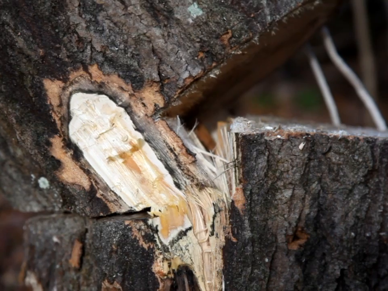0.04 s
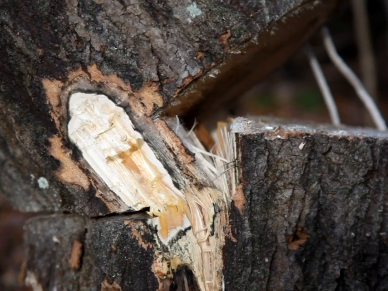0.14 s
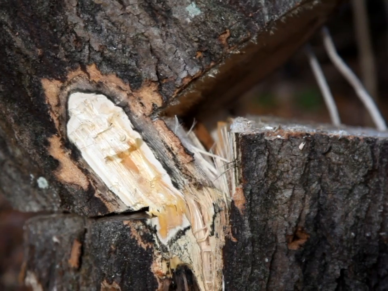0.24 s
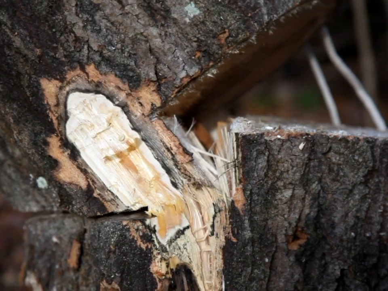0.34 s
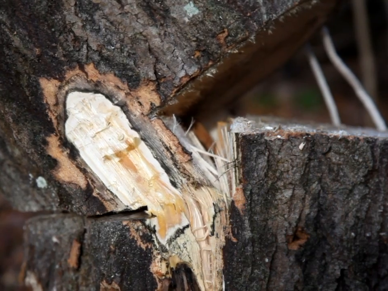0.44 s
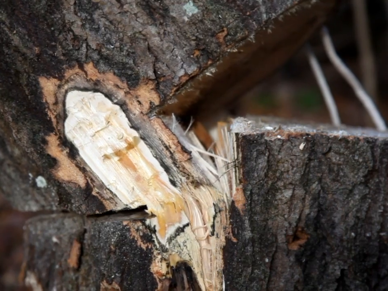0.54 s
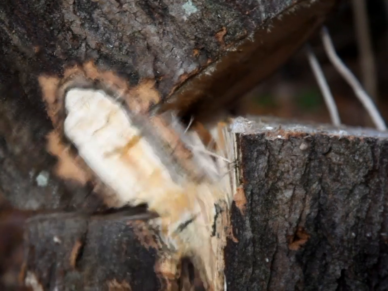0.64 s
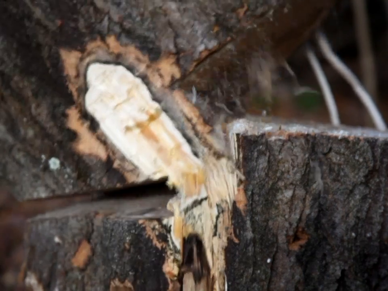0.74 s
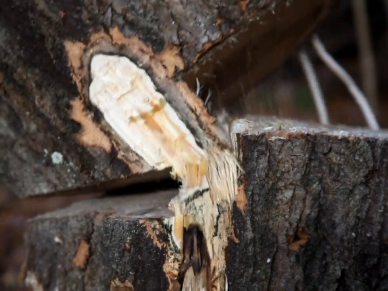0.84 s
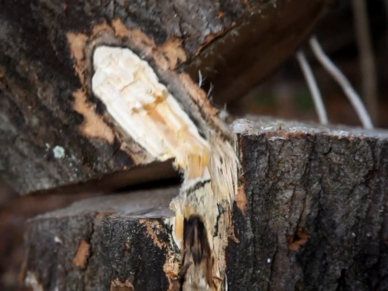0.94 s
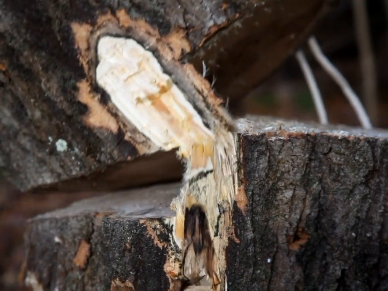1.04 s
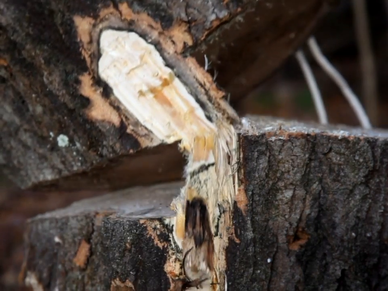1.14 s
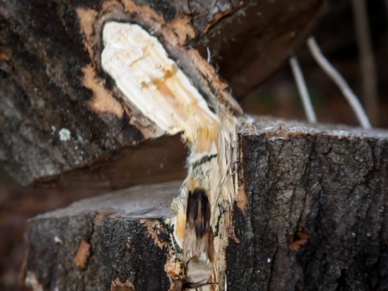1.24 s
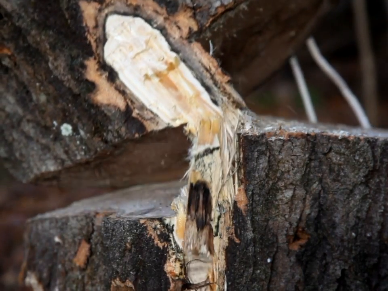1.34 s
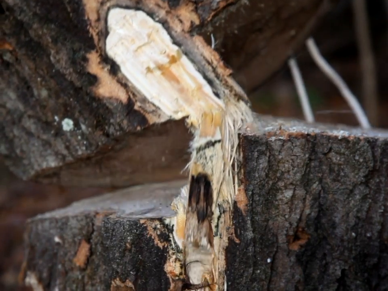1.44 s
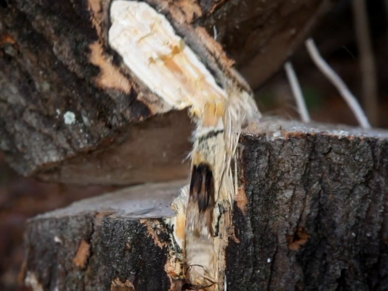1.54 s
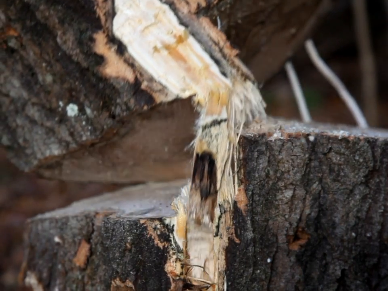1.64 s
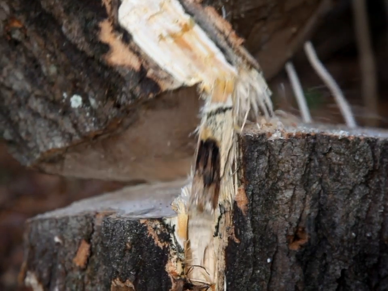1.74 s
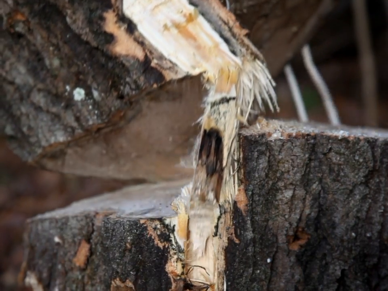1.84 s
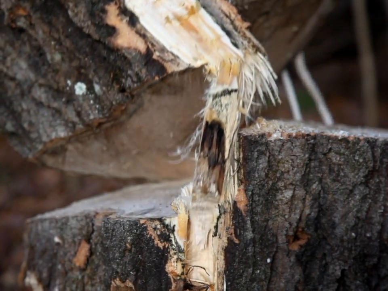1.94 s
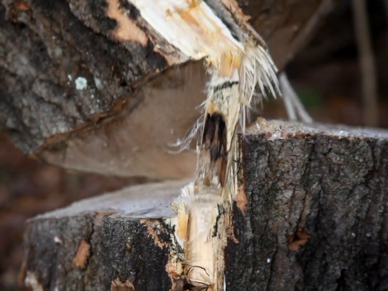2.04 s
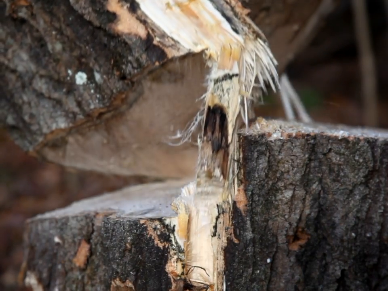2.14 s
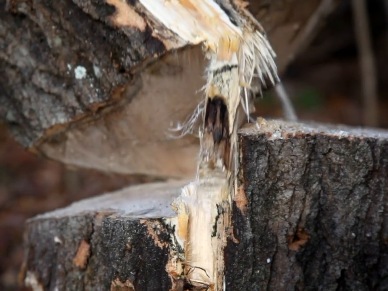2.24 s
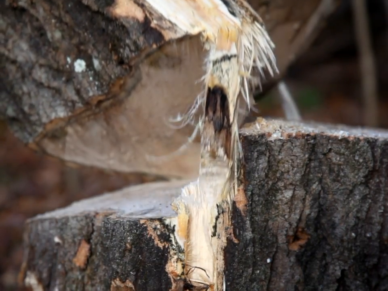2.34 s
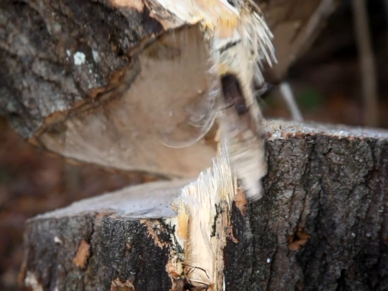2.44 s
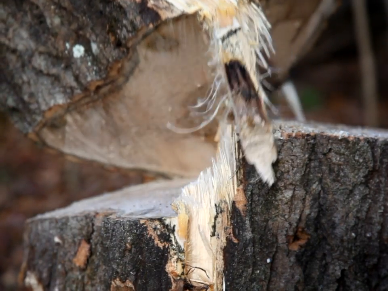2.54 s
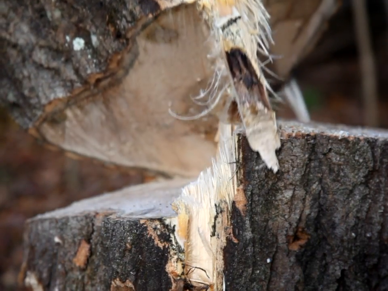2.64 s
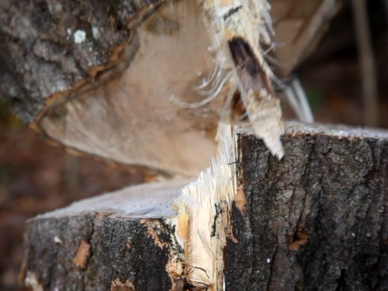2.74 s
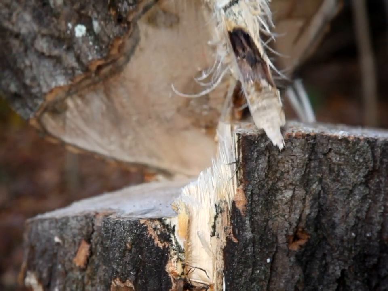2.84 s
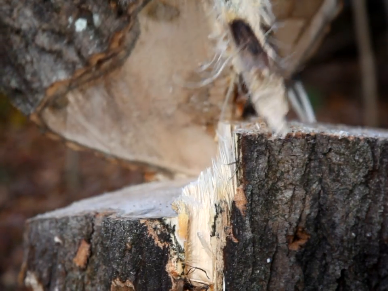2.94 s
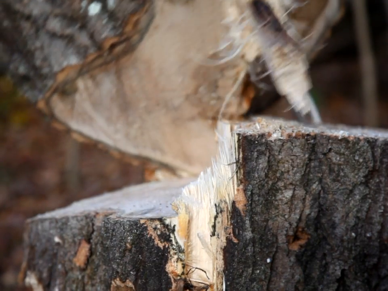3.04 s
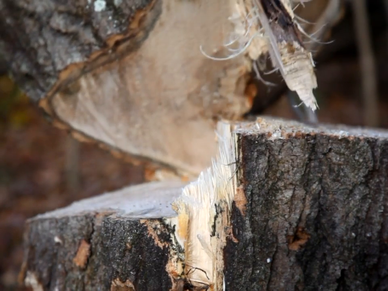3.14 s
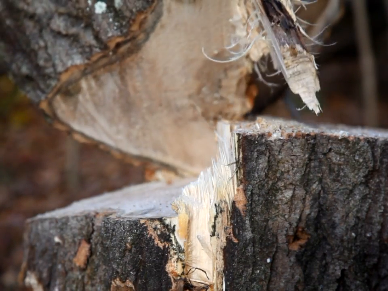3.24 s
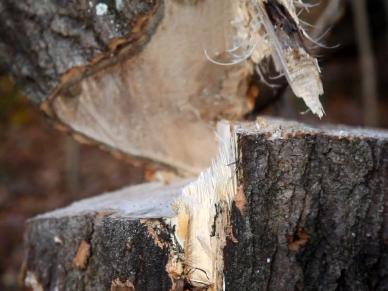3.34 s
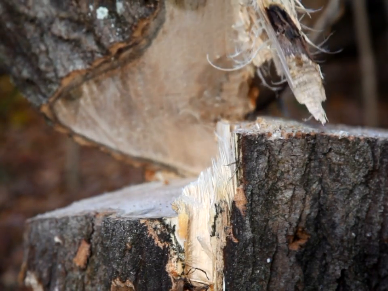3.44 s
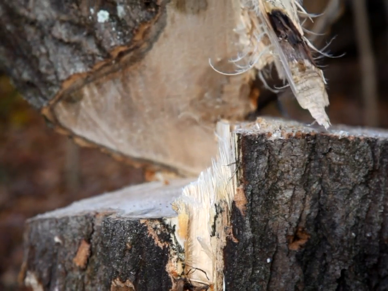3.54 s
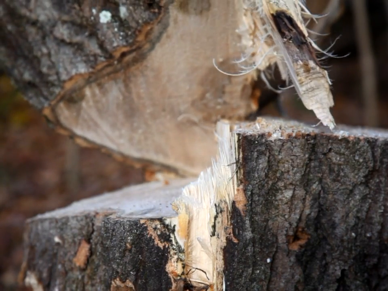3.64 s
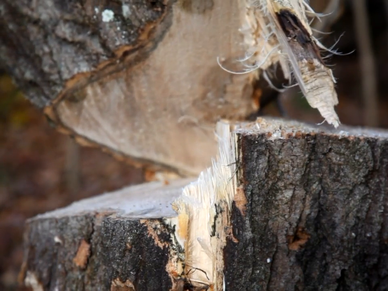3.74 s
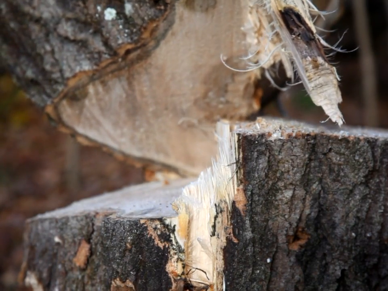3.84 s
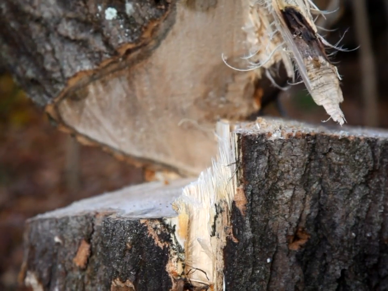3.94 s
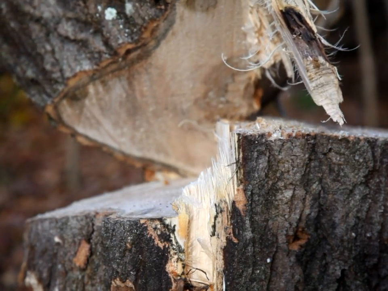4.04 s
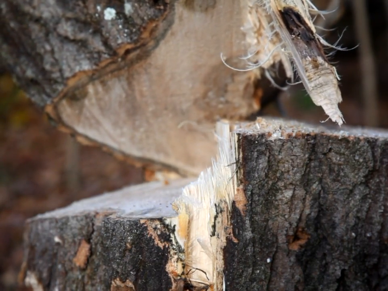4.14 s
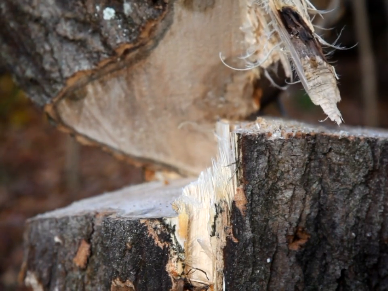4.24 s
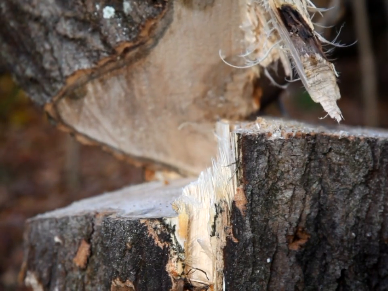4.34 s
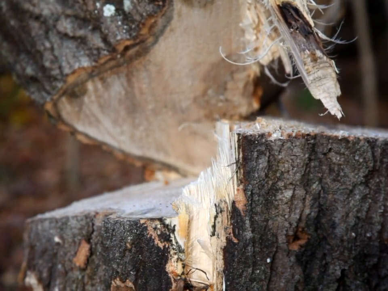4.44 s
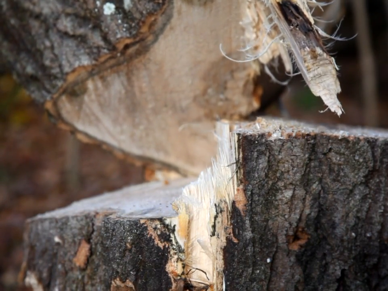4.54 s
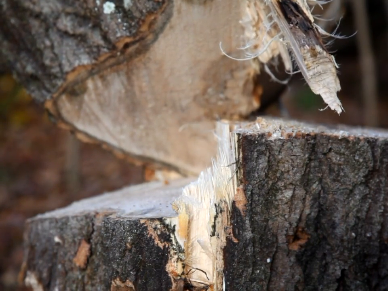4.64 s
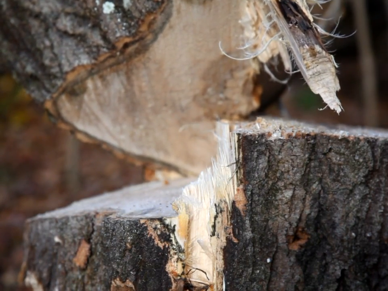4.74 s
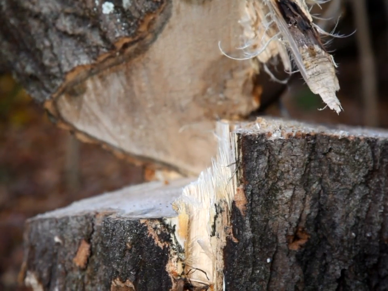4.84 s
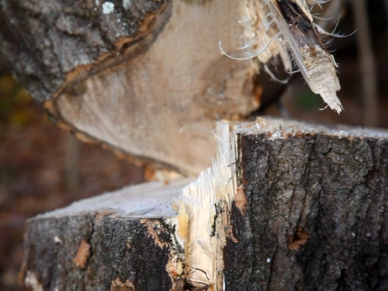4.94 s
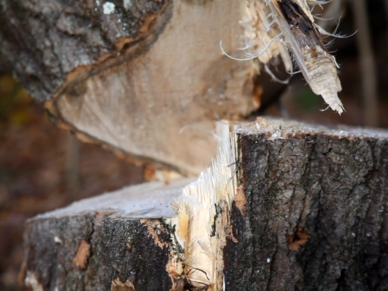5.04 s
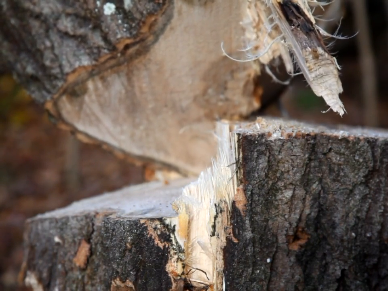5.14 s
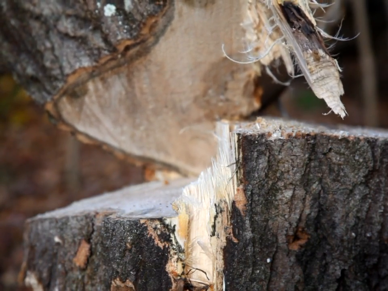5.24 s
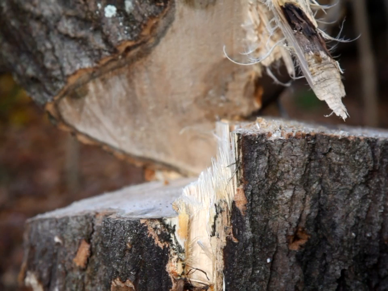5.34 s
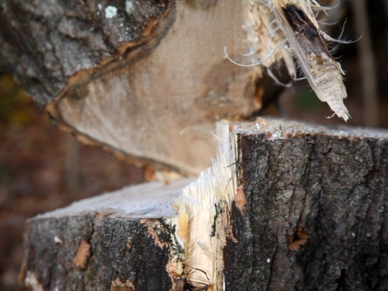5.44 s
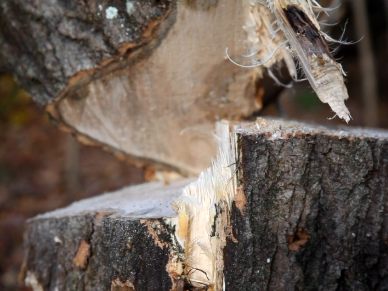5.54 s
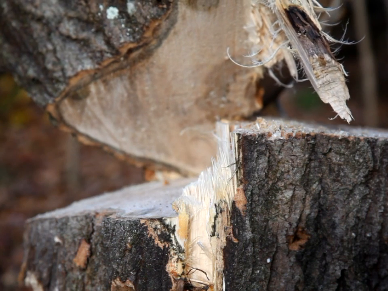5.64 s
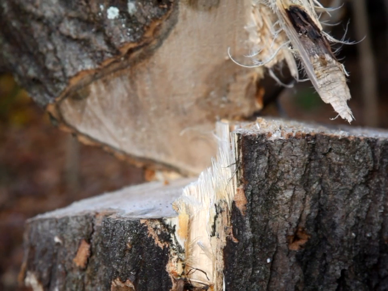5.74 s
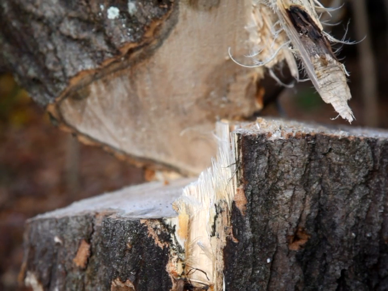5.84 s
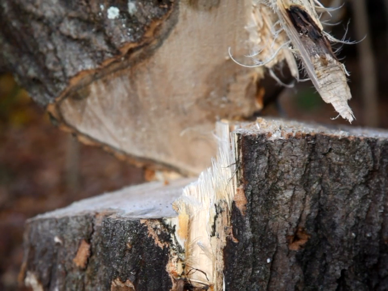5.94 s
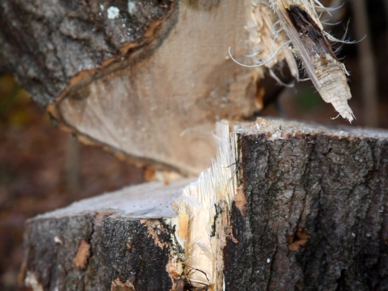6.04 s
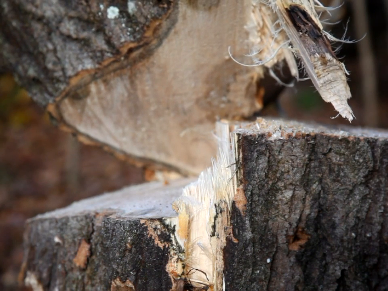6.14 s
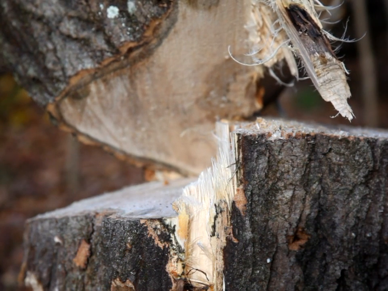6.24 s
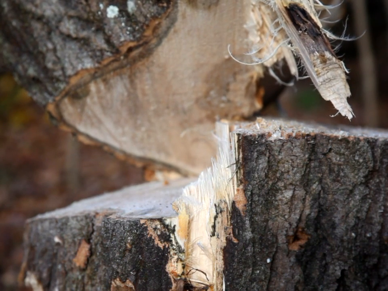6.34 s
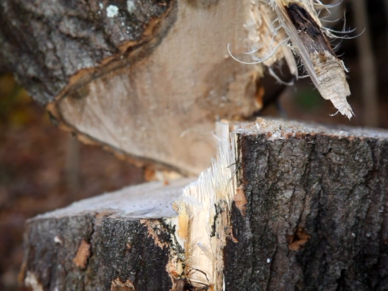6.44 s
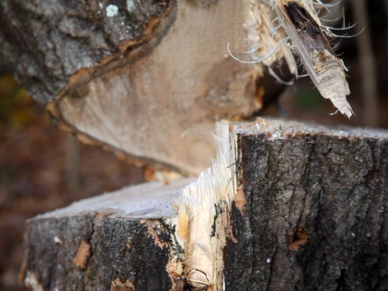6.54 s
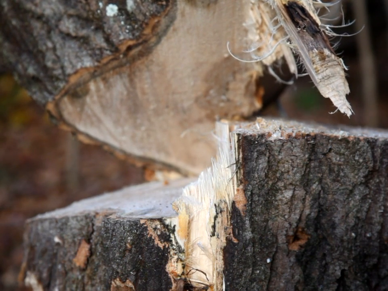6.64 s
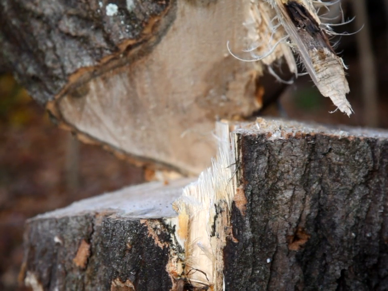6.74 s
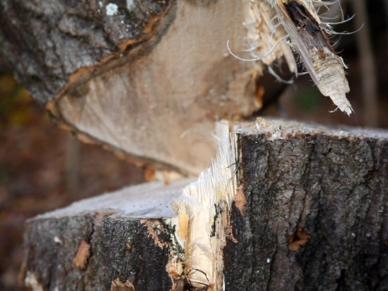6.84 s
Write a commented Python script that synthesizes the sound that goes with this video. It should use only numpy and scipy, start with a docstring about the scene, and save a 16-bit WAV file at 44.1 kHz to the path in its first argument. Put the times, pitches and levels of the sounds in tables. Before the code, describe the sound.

Beside a tree stump outdoors, dry, bright snaps of breaking fibres come in quick irregular bursts and peak in one loud, splintering crack with a short woody thump. Softer crunches and quickening pops follow, with fine tearing and a faint groan, until the last strip lets go. Then a hissing rush of leaves and branches swells, with twig ticks and light knocks. A faint engine idles beneath. Close microphone, little echo.

```python
"""Beside the stump of a partly cut tree as it tips over.
Breaking fibres are sharp pulses filtered by the wood; a thick strip bursts and rings the trunk's modes,
a last strip jerks out in pops, and the bent hinge groans by stick and slip. Small tearing and the rush
of the crown are dense random ticks and hiss, with knocks of filtered noise and scattered echoes.
Underneath lie the low throb of an idling engine, made of soft puffs, and a steady hiss of air."""
import sys
import numpy as np
from scipy import signal
from scipy.fft import rfft, irfft
from scipy.io import wavfile
from scipy.ndimage import uniform_filter1d

SR = 44100
rng = np.random.default_rng(int(sys.argv[2]) if len(sys.argv) > 2 else 0)


def materialize(psi):
    """Save the field psi as 16-bit PCM at rate SR to the path in sys.argv[1].

    A 1-D psi becomes a single channel; in a 2-D psi each row is a channel.
    """
    bounded = np.clip(np.atleast_2d(psi).T, -1, 1)
    quanta = np.round(bounded * 32767).astype(np.int16)
    wavfile.write(sys.argv[1], SR, quanta)


N = 303408
TIME = np.arange(N) / SR

# basic spectrum of breaking wood: frequency_hz, level_db
BREAK_SPECTRUM = [(30, -40), (100, -22), (400, -14.5), (900, -7), (2000, -2.5), (3400, -1.24), (4800, -1),
                  (6500, -1.5), (8200, -5.5), (9800, -17.5), (13000, -25.5), (16000, -51)]
# jolts of the trunk as thick strips let go: start_s, level_db
TRUNK_JOLTS = [(.411, -31), (.595, -30), (.7435, -6.5), (0.7482, -16.5), (0.7611, -19), (3.148, -34)]


def amp(db):
    """Decibels are logarithmic: 20 dB is a tenfold amplitude."""
    return 10 ** (np.asarray(db) / 20)


def evened(x):
    """Normalises mean power: scales to rms 1."""
    return x / np.sqrt(np.mean(x ** 2) + 1e-20)


def unit(x):
    """Normalises energy: scales the sum of squares to 1."""
    return x / (np.linalg.norm(x) + 1e-20)


def read(points, hz):
    """Interpolates a spectrum along log frequency, the scale of pitch."""
    f, value = np.transpose(points)
    return np.interp(np.log(hz + 1), np.log(f + 1), value)


def follow(rows, t=TIME):
    """Interpolates each column of a time curve linearly at times t."""
    s, *columns = np.transpose(rows)
    return [np.interp(t, s, c) for c in columns]


def add(mix, s, sound):
    """Superposition: sounds add, here from time s on."""
    part = mix[round(s * SR):][:len(sound)]
    part += sound[:len(part)]


def coloured(x, db):
    """Minimum-phase filter: folding the cepstrum makes the given dB spectrum causal."""
    cepstrum = irfft(np.log(amp(db)), len(x))
    cepstrum[1:len(x) // 2] *= 2
    cepstrum[len(x) // 2 + 1:] = 0
    return irfft(rfft(x) * np.exp(rfft(cepstrum)), len(x))


def band(x, low_hz, high_hz):
    """Band-pass with the gentle flanks of a low-order Butterworth filter."""
    sos = signal.butter(2, [low_hz, high_hz], "band", fs=SR, output="sos")
    return signal.sosfilt(sos, x)


def wander(length, span):
    """Low-passed chance: noise averaged twice over span points, at rms 1."""
    once = uniform_filter1d(rng.standard_normal(length), span)
    return evened(uniform_filter1d(once, span))


def resonate(x, hz, width):
    """Resonance of gain 1 along the curve hz: two equal poles in a frame turning at that pitch."""
    turn = np.exp(2j * np.pi * np.cumsum(hz) / SR)
    r = np.exp(-2 * np.pi * width / SR)
    return 2 * (turn * signal.lfilter([(1 - r) ** 2], [1, -2 * r, r * r], x / turn)).real


def snap(s, db, body_db, bright_db, top_db, splinter, ring_db, fibre_hz,
         splinter_s=0.0012, ring_s=0.0038, scatter=0.22, rebound=0.62, lead_db=-17, lead_s=0.00065):
    """Impulsive fracture: tiny cracks lead to a sharp pulse, then a spray and a short ring in the wood."""
    size, lead_count = 4096, 256
    t, hz = np.arange(size) / SR, np.fft.rfftfreq(size, 1 / SR)
    level_count = round(.002 * SR)  # levels are rms over 2 ms
    spray, ring = rng.standard_normal((2, size))
    force = np.sqrt(splinter) * unit(spray * np.exp(-t / splinter_s))
    force[0] += np.sqrt(1 - splinter)
    lead_noise = rng.standard_normal(lead_count) * np.exp(-t[:lead_count] / lead_s)
    lead = amp(lead_db) * unit(lead_noise)[::-1]  # reversed, so that it grows
    force = np.concatenate([lead, force])[:size]
    decay = np.exp(-t / ring_s) + scatter * np.exp(-t / 0.014)
    ring *= decay * (1 - np.exp(-(t / 0.0012) ** 2))
    colour_db = read(BREAK_SPECTRUM, hz)
    colour_db += read([(900, body_db), (2000, 0), (3700, 0), (6000, bright_db)], hz)
    colour_db += read([(8000, 0), (11000, top_db)], hz)
    # the pulse returns inverted from the fibre's end: peaks at odd multiples of its pitch, hollows between
    returned = rebound * (1 - splinter / 2)
    fibre_db = 20 * np.log10(abs(1 - returned * np.exp(-1j * np.pi * hz / fibre_hz)))
    crack = coloured(force, colour_db + fibre_db + 1.63 * wander(len(hz), 66))
    ring = coloured(np.roll(ring, lead_count), colour_db + 2.5 * wander(len(hz), 27))
    sound = amp(db) * np.sqrt(level_count) * (unit(crack) + amp(ring_db) * unit(ring))
    return s - lead_count / SR, sound


def cracks():
    """Brittle fracture of fibres of all sizes: the more one splinters, the stronger its after-ring."""
    # fibres that break: start_s, level_db (over 2 ms), body_db, brightness_db, splintering (0-1)
    breaks = [(0.024, -34.5, 5, 2, 0.87), (0.0579, -6.5, -5, 6.5, 0.04), (.0773, -22, 6, 4.5, 0.36),
              (.118, -35, 0, 9, .3), (0.1373, -22.5, 6, 17, 0.1), (0.1397, -21.5, -4, 4.5, 0.24),
              (.183, -16.5, 2, 9, 0.46), (0.2694, -24, 20, 5.5, 0.27), (.274, -24.5, 1, 13, .45),
              (.3462, -17, -3, 13, 0.4), (0.349, -19, 9, 14, 0.3), (0.4079, -23, -12, 2, 0),
              (.411, -16, 15.5, 4.5, 0.63), (0.4515, -16.5, -7, 24, 0.3), (.455, -10, 2, 2.5, 0.48),
              (0.4706, -20, 11, 7, .5), (0.475, -19, -2, 8, 0.1), (.4837, -20, 8, 20, 0.1),
              (.4896, -14.5, 8.5, 5, 0.4), (0.4991, -21, 13, 11, 0.03), (.5106, -36, 8, 16, .3),
              (.5356, -22, 0, 11, 0.4), (0.5366, -13.5, 6, 3.5, 0.57), (.5523, -24, 4, 3, .5),
              (0.575, -10.5, 13.5, 4.5, 0.44), (0.5845, -20.5, -4, 7, 0.65), (0.5938, -12.5, 8.5, 4, 0.55),
              (.688, -25, 8, 9, 0.4), (.698, -22.5, 8, 8, 0.15), (.71, -26, 10, 9, 0.4),
              (.733, -26, 15, 10, 0.6), (.7432, -5, 15.5, 3.5, 0.81), (0.7568, -15, 1, 12, 0.6),
              (.76, -9.5, 7, -2, 0.83), (0.985, -29, 3, 0.5, 0.77), (1.0703, -22.5, 7, -0.5, 0.9),
              (1.2003, -21.5, 6.5, 0.5, 0.98), (1.2588, -23, 7, -1, 1), (1.3753, -21.5, 6.5, -7, .75),
              (1.454, -18.5, 8.5, 0.5, 0.84), (1.516, -18.5, 10.5, 1.5, 0.96), (1.6555, -22, -1, 2, 0.73),
              (1.6683, -19, 3, -10, 0.4), (1.7724, -18.5, 10, -1.5, .75), (1.8968, -29, 0, 4, .7),
              (1.8997, -21.5, 13, 1.5, 0.8), (1.9633, -22, 15, 1, .45), (1.9804, -19.5, 15.5, -5, 0.97),
              (2.002, -19, 8, -5, 0.43), (2.0176, -22, 11, -6, 0.9), (2.0592, -23.5, 10, 2, .6),
              (2.0923, -20.5, 8.5, -6, .3), (2.2012, -17.5, -11, 0, .45), (2.291, -20.5, 8.5, 1, 1),
              (2.6502, -17.5, 3, 0, .3), (2.7436, -25.5, -10, -2, 0.75), (2.918, -24, 3, -17.5, 0.9),
              (3.1505, -23.5, 8, 7, 0.6), (3.2308, -28, 2, -5.5, 1), (3.324, -36, 8, 15, .3),
              (3.4753, -21.5, 11, 2, 0.45), (3.551, -31.5, -12, 3, 0.86), (3.6646, -30, 12.5, -4, 0.64),
              (3.7281, -28.5, 10, -1, 0.86), (4.4592, -28, -6, -12, 1), (5.2405, -24.5, 12, 12, 0.6),
              (5.2601, -18, 11, 18, .5), (5.6272, -30, 6, 6, 0.75), (6.0193, -25, 6, 23, 0.85),
              (6.231, -20.5, 9, -14, 0.73), (6.4503, -23.5, -9, 4, 0.5), (6.581, -24, 13.5, 19, .7)]
    typical_hz, spread_octaves = 3110, 0.34
    clean_ring_db, splintered_ring_db = -17, 0
    # the first fibres break at the open edge, later ones deep in the cut
    open_top_db, shaded_top_db, shading_s = 1.5, -2.5, 1
    top_per_db, middling_db = 0.35, -18.5  # a stronger break is quicker, so it has more top
    out = np.zeros(N)
    for s, db, body_db, bright_db, splinter in breaks:
        ring_db = clean_ring_db + (splintered_ring_db - clean_ring_db) * splinter
        top_db = open_top_db if s < shading_s else shaded_top_db
        top_db += top_per_db * (db - middling_db)
        fibre_hz = typical_hz * 2 ** (spread_octaves * rng.standard_normal())
        add(out, *snap(s, db, body_db, bright_db, top_db, splinter, ring_db, fibre_hz, rebound=0.67))
    return out


def trunk(rise_cycles=1.74):
    """Modal vibration: a jolt rings decaying sines, the deep modes swelling last."""
    # modes of the trunk: pitch_hz, level_db (added to the jolt's), t60_s
    trunk_modes = [(46, -13, 0.15), (65, -20, 0.21), (119, -22, 0.19), (202.5, -22, 0.16),
                   (264.5, -11.5, 0.12), (425, -5, 0.047), (507, 8, 0.031), (756, 1.5, 0.023),
                   (910, -0.5, 0.018), (1080, -1, 0.018), (1370, -1, 0.011), (1430, 3, 0.017),
                   (1650, 4, 0.016)]
    out, t = np.zeros(N), np.arange(SR // 2) / SR
    for s, db in TRUNK_JOLTS:
        for hz, mode_db, t60 in trunk_modes:
            swell = 1 - np.exp(-(hz * t / rise_cycles) ** 2)
            tone = np.sin(2 * np.pi * (hz * t + rng.random()))
            add(out, s, amp(db + mode_db - 60 * t / t60) * swell * tone)
    return out


def pops():
    """Reflection in a lengthening strip: one piece makes every pop, so their colour changes smoothly."""
    # dry pops as the last long strip jerks out of the stump: start_s, level_db (over 2 ms)
    jerks = [(.957, -36), (1.034, -34), (1.054, -37), (1.0855, -33), (1.119, -35.5), (1.148, -32),
             (1.1755, -32), (1.285, -30.5), (1.3155, -28.5), (1.34, -29.5), (1.5508, -27.5), (1.5892, -28),
             (1.6189, -28), (1.6251, -26), (1.684, -25.5), (1.7124, -27.5), (1.7412, -27.5),
             (1.7958, -28.5), (1.8218, -28.5), (1.847, -27), (1.8819, -25.5), (1.921, -26), (1.9669, -23.5),
             (2.0473, -21), (2.0778, -23.5), (2.1308, -21.5), (2.263, -21), (2.3157, -15), (2.3606, -19),
             (2.403, -21), (2.4219, -30), (2.4397, -21), (2.4553, -26), (2.475, -26), (2.4946, -20.5),
             (2.5353, -18), (2.55, -22.5), (2.567, -21), (2.6105, -15), (2.6239, -19), (2.6377, -26),
             (2.6681, -17.5), (2.683, -22.5), (2.699, -29), (2.7958, -15.5), (2.8356, -15.5),
             (2.8739, -15.5), (2.948, -15), (3.027, -16.5), (3.0448, -20.5), (3.0576, -21), (3.067, -21.5),
             (3.0766, -21), (3.0872, -20), (3.1005, -21), (3.1392, -16.5)]
    # state of the strip: time_s, pitch_hz, brightness_db, splintering (0-1)
    strip_state = [(1, 2660, -3, 0.25), (1.75, 2900, -3, .45), (2.1, 2920, -7, 0.5), (2.38, 3120, 0, 0.3),
                   (2.62, 2730, 7.5, 0), (2.95, 2380, 4, 0.25), (3.04, 2250, 3, 0.05), (3.14, 1980, 0, 0)]
    out = np.zeros(N)
    for s, db in jerks:
        hz, bright_db, splinter = follow(strip_state, s)
        add(out, *snap(s, db, -3, bright_db, -6, splinter, -13, hz, splinter_s=0.00066, ring_s=0.006,
                       scatter=0.28, rebound=.78, lead_db=-22, lead_s=0.00034))
    return out


def creak(length, db, factor, jitter=.15, uneven_db=2, scrape=0.078):
    """Stick-slip friction: ever faster slips ring the bent hinge, whose pitch sags as it pulls free."""
    # resonances of the hinge: pitch_hz, pole_half_width_hz, relative level_db
    hinge_modes = [(464, 45, -9), (911, 62, 7.5), (960, 52, 2), (1330, 76, -13), (1650, 170, -9.5)]
    slips_per_s, slip_gain_per_s2 = 68, 145  # starting rate and its growth
    pitch_sag = 0.17  # share of pitch lost by the end
    side_start_db, side_end_db = 17, -24  # lift of the side modes
    attack_s, hold_share, fade_db = 0.033, 0.58, -22.5
    t = np.arange(0, length, 1 / SR)
    done = t / length
    rate = slips_per_s + slip_gain_per_s2 * t
    sag = factor * (1 - pitch_sag * done ** 3)
    side_db = side_start_db + (side_end_db - side_start_db) * done ** 2
    turns = np.cumsum(rate * np.exp(jitter * wander(SR, 200)[:len(t)])) / SR
    strength, rub = rng.standard_normal((2, SR))[:, :len(t)]
    # one impulse whenever the count of turns passes a whole number
    slips = np.diff(np.floor(turns), prepend=0) * amp(uneven_db * strength) / np.sqrt(rate)
    drive = evened(slips) + np.sqrt(scrape) * rub
    low, main, twin, *upper = (amp(level) * resonate(drive, hz * sag, width)
                               for hz, width, level in hinge_modes)
    sides = amp(side_db) * (low + sum(upper))
    strip = main + twin  # two close modes beat against each other
    wood = (strip + sides) / np.std(strip) / np.sqrt(1 + 0.3 * amp(side_db) ** 2)
    envelope_db = db + np.interp(done, [hold_share, 1], [0, fade_db])
    return np.minimum(t / attack_s, 1) * amp(envelope_db) * wood


def creaks():
    """Friction in the hinge makes it groan as the tree leans over."""
    # creaks: start_s, length_s, level_db, pitch_factor (on the hinge's resonances)
    groans = [(1.954, 0.61, -31, 1.027), (2.798, .14, -44, 0.65)]
    out = np.zeros(N)
    for start, *row in groans:
        add(out, start, creak(*row))
    return out


def crackle(colour, per_s, size_db, hiss, flicker_db, count=16, size=128):
    """Shot noise: countless ticks of several grains over the hiss of those too small to tell apart."""
    t, ticks = np.arange(size) / SR, np.zeros(N)
    for _ in range(count):
        train = np.zeros(N)
        at = rng.integers(0, N, int(per_s * N / SR / count))
        train[at] = amp(size_db * np.minimum(rng.exponential(1, len(at)), 4))
        grain = unit(rng.standard_normal(size) * np.exp(-t / 0.0009))
        ticks += np.convolve(train, grain)[:N]
    sound = np.sqrt(1 - hiss) * evened(ticks - ticks.mean())
    sound += np.sqrt(hiss) * rng.standard_normal(N)
    flickering = sound * amp(flicker_db * wander(N, 810))
    return coloured(flickering, read(colour, np.fft.rfftfreq(N, 1 / SR)))


def played(sound, gains, body_low_hz, body_high_hz, split_hz):
    """Band splitting: the crisp top and woody body of a crackle each get a level in time."""
    top_gain, body_gain = gains
    hz = np.fft.rfftfreq(N, 1 / SR)
    body = irfft(rfft(sound) / (1 + (hz / split_hz) ** 4), N)
    top_rms = np.std(band(sound, 2500, 10000))
    body_rms = np.std(band(sound, body_low_hz, body_high_hz))
    return top_gain * (sound - body) / top_rms + body_gain * body / body_rms


def swelled(top_db, body_db, swells):
    """Powers of independent sounds add: bell-shaped swells on steady levels give top and body gains."""
    top, body = amp(top_db) ** 2, amp(body_db) ** 2
    for s, peak_db, peak_body_db, half_s in swells:
        bell = np.exp(-.5 * ((TIME - s) / half_s) ** 2)
        top = top + bell * amp(peak_db) ** 2
        body = body + bell * amp(peak_body_db) ** 2
    return np.sqrt(top), np.sqrt(body)


def tearing():
    """Superposed small fractures: fibres tear all the time, and in surges when a bundle gives way."""
    # steady tearing, which jumps as the hinge bursts: time_s, level_db, body_db
    steady = [(0, -56.5, -65.5), (.73, -53.5, -59.5), (.78, -41, -46), (.95, -54, -46.5),
              (1.6, -46.5, -53.5), (3.1, -43.5, -46.5), (3.9, -45.5, -51)]
    # surges as whole bundles give way: peak_s, level_db, body_db, half_length_s
    bundles = [(2.025, -40, -57, 0.032), (2.323, -38, -38, 0.19), (2.846, -38, -39.5, .09)]
    # spectrum of the tearing: frequency_hz, level_db
    tear_spectrum = [(40, -37), (100, -6.5), (166, -9), (240, -7.5), (500, -9), (700, -12.5), (1500, -8),
                     (2600, -4), (5000, -3.5), (7000, -0.5), (8500, -8.5), (10000, -16.5), (13000, -29),
                     (16000, -37)]
    sound = crackle(tear_spectrum, per_s=700, size_db=2.5, hiss=0.36, flicker_db=1.5)
    return played(sound, swelled(*follow(steady), bundles), 210, 1680, split_hz=1950)


def crown():
    """Many small impacts of leaves: the rush swells as the crown gathers speed; boughs swish on top."""
    # single boughs swishing through leaves: peak_s, level_db, body_db, half_length_s
    boughs = [(4.15, -42.5, -67, 0.11), (4.388, -36, -41, 0.016), (4.55, -37, -49, 0.013),
              (4.654, -36, -49, 0.071), (4.96, -40, -45, 0.043), (5.265, -36.5, -48.5, 0.13),
              (5.86, -38.5, -60, 0.02), (6.063, -38, -44, 0.046), (6.295, -38, -45, 0.039),
              (6.51, -39.5, -49, 0.11), (6.812, -34.5, -47.5, 0.039)]
    # spectrum of the leaves: frequency_hz, level_db
    leaf_spectrum = [(59, -26), (100, -1), (129, -7), (277, -9.5), (513, -9), (583, -10), (648, -12),
                     (801, -10), (1150, -8.5), (1250, -7.5), (2520, -6), (6560, -0.5), (8460, -7.5),
                     (12900, -31), (16000, -38)]
    full_s, full_db, full_body_db = 4.63, -37.5, -47.5
    rise_db_per_s, ease_db_per_s = 13.5, 0.77
    body_share = 0.11  # the body follows only this share of the swell
    swell_db = np.minimum(rise_db_per_s * (TIME - full_s), ease_db_per_s * (full_s - TIME))
    sound = crackle(leaf_spectrum, per_s=1700, size_db=3.5, hiss=0.6, flicker_db=1.22)
    gains = swelled(full_db + swell_db, full_body_db + body_share * swell_db, boughs)
    return played(sound, gains, 560, 2630, split_hz=2030)


def knocks(spread=1.2, widening=0.17, rise_s=0.0012, rattle_db=3):
    """Damped impact noise: heavy limbs thud softly; lighter pieces clatter higher over a wider band."""
    # knocks and clatter of limbs, bark and trunk: start_s, level_db, pitch_hz, t60_s
    impacts = [(0.604, -48, 126, 0.21), (0.767, -31, 260, 0.14), (.76, -33, 1860, 0.32),
               (.785, -37.5, 1190, 0.57), (1.378, -33.5, 970, 0.12), (2.76, -42.5, 330, 0.58),
               (3.15, -36, 480, 0.094), (3.163, -31.5, 254, 0.17), (3.229, -32.5, 1750, 0.15),
               (4.243, -40.5, 446, 0.18), (4.46, -35, 507, 0.073), (4.634, -37.5, 690, .18),
               (4.87, -39, 286, 0.19), (4.914, -32.5, 1487, 0.062), (5.193, -41.5, 270, 0.3),
               (5.217, -36, 1470, 0.13), (5.718, -37.5, 1200, 0.047), (6.181, -36.5, 564, 0.17),
               (6.226, -35, 410, 0.2), (6.232, -35, 2340, 0.5), (6.742, -28.5, 3600, 0.08),
               (6.785, -42.5, 188, 0.15), (6.794, -30.5, 1590, 0.12)]
    out, t = np.zeros(N), np.arange(SR // 2) / SR
    for s, db, hz, t60 in impacts:
        ratio = spread * max(hz / 450, 1) ** widening
        envelope = amp(-60 * t / t60) * (1 - np.exp(-t / rise_s))
        contact = rng.standard_normal(len(t)) * amp(rattle_db * wander(len(t), 88))
        thud = band(contact, hz / ratio, hz * ratio) * envelope
        add(out, s, amp(db) * unit(thud) * np.linalg.norm(envelope))
    return out


def twigs(per_s, level_db, size_db):
    """Poisson process: single fibres and twigs tick at random; level_db is before colouring."""
    sizes = amp(level_db + size_db * np.minimum(rng.exponential(1, N), 2))
    train = sizes * (rng.random(N) < per_s / SR)
    hz = np.fft.rfftfreq(N, 1 / SR)
    return coloured(train, read(BREAK_SPECTRUM, hz) + read([(1000, 5), (7000, 15.5)], hz))


def woods(x, size=256):
    """Reverberation: scattered echoes from the trees around, whose decay depends on frequency."""
    # decay of the echoes: frequency_hz, t60_s
    echo_decay = [(100, 0.98), (500, 0.33), (2000, 0.16), (6000, 0.18), (14000, 0.2)]
    taps = rng.choice([-1., 1.], SR) * (rng.random(SR) < 2000 / SR)
    taps *= np.arange(SR) > .012 * SR  # silence before the first echo
    hz, t, z = signal.stft(taps, SR, nperseg=size)
    tilt_db = read([(1500, -8.5), (6000, -19.5), (14000, -2)], hz)[:, None]
    z *= amp(-60 * t / read(echo_decay, hz)[:, None] + tilt_db)
    return signal.oaconvolve(x, unit(signal.istft(z, SR, nperseg=size)[1]))[:N]


def throb(push=0.22):
    """Periodic pulses of an idling engine: a soft, deep puff a firing, over a slow push of air."""
    # level of the puffs, which come forward after 3.2 s: time_s, level_db
    puff_level = [(.7, -68), (.9, -54), (3.2, -57), (3.39, -41), (3.8, -46), (6.88, -47)]
    start_s, period_s, puff_s, push_s = .0022, .06452, 0.013, 0.022
    # the pitch lifts once and settles back
    idle_hz, lift_hz, lift_s, rise_s, settle_s = 72.8, 22.3, 3.2, .2, 1.5
    db, = follow(puff_level)
    since = np.maximum(TIME - lift_s, 0)
    hz = idle_hz + lift_hz * np.minimum(since / rise_s, np.exp((rise_s - since) / settle_s))
    out = np.zeros(N)
    firing = (TIME - start_s) / period_s
    strength = amp(rng.standard_normal(int(firing[-1]) + 3))
    # each moment hears the firing before it and the one after
    for nearest in (np.floor(firing), np.ceil(firing)):
        t = (firing - nearest) * period_s
        puff = np.exp(-.5 * (t / puff_s) ** 2) * np.sin(2 * np.pi * hz * t)
        puff += push * np.exp(-.5 * (t / push_s) ** 2) * np.sin(2 * np.pi * 52 * t)
        out -= strength[nearest.astype(int)] * puff
    return amp(db) * out


def open_air(level_db=-62.5):
    """Stationary filtered noise: the steady hiss of the open air."""
    # spectrum of the air: frequency_hz, level_db
    air_spectrum = [(18, -56.5), (30, -15), (684, -5), (1430, -23), (1760, -8), (4080, -5), (6050, 10),
                    (12300, -6), (16000, -34)]
    colour_db = read(air_spectrum, np.fft.rfftfreq(N, 1 / SR))
    return amp(level_db) * evened(coloured(rng.standard_normal(N), colour_db))


def scene(echo_db=-21, ticking=0.39):
    """Equal-power crossfade: the hinge tears first; the rush of the crown takes over as the tree goes down."""
    falling = np.clip((TIME - 3.7) / .2, 0, 1)
    rustle = np.sqrt(1 - falling) * tearing() + np.sqrt(falling) * crown()
    busy = evened(np.sqrt(abs(uniform_filter1d(rustle ** 2, size=4000))))
    # ticks are louder where more is breaking
    ticks = twigs(per_s=35, level_db=-31.5, size_db=2.5) * busy ** ticking
    # the strained hinge ticks until it bursts
    ticks += twigs(per_s=58, level_db=-35, size_db=7.0) * (TIME < TRUNK_JOLTS[2][0])
    wood = cracks() + pops() + trunk() + creaks() + knocks()
    return (wood + amp(echo_db) * woods(wood) + rustle + ticks + throb() + open_air())[None]


def record(dry, limit_db=-9.5, react_s=0.00036):
    """Dynamic compression: a fast limiter flattens long bursts but passes spikes; then clip and low-pass."""
    keep = np.exp(-1 / (react_s * SR))
    level = np.sqrt(signal.lfilter([1 - keep], [1, -keep], dry ** 2))
    limited = np.clip(dry / np.maximum(level / amp(limit_db), 1), -1, 1)
    low_pass = signal.firwin(511, 16400, window=("kaiser", 9), fs=SR)  # edge in Hz
    return signal.oaconvolve(limited, low_pass[None], "same")


dry = scene()
out = record(dry)
materialize(out)
```